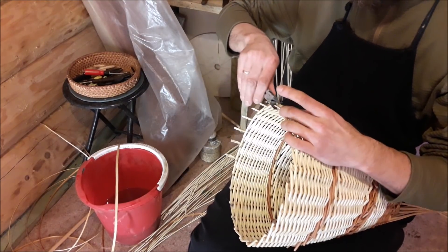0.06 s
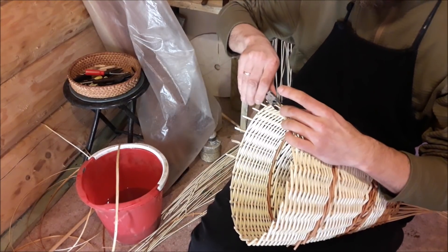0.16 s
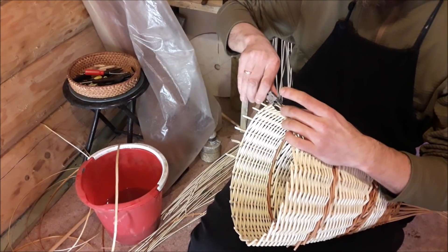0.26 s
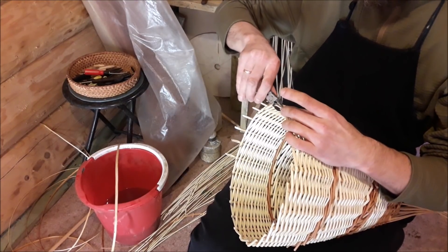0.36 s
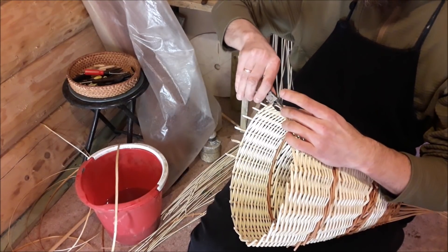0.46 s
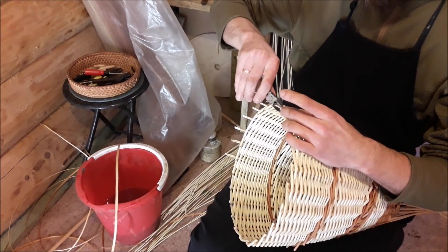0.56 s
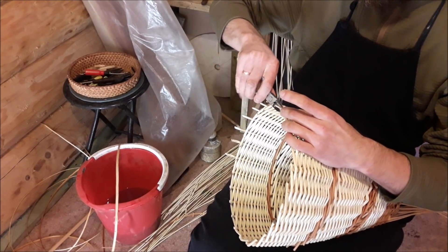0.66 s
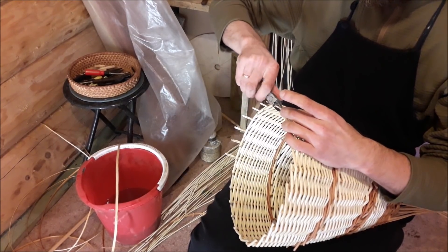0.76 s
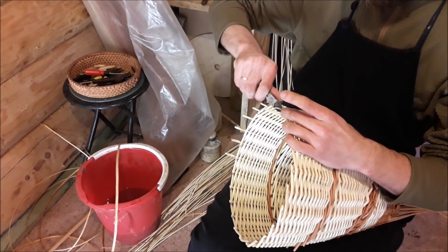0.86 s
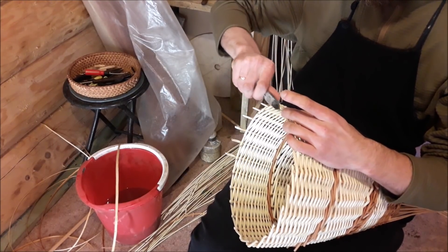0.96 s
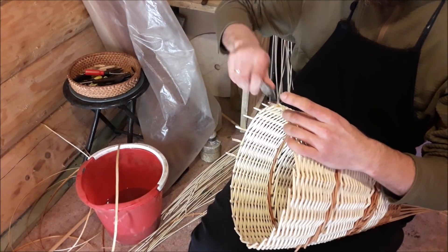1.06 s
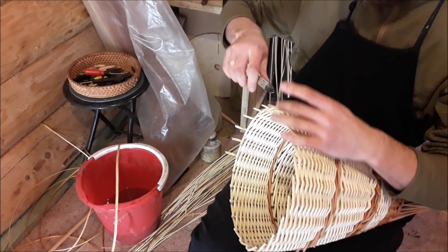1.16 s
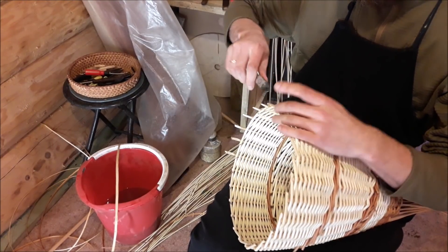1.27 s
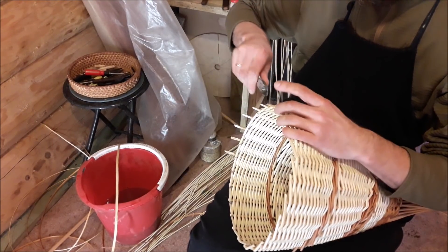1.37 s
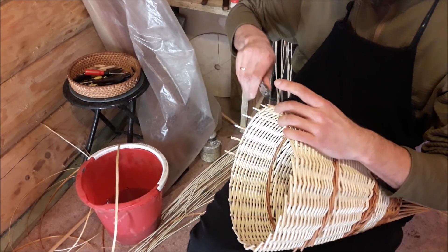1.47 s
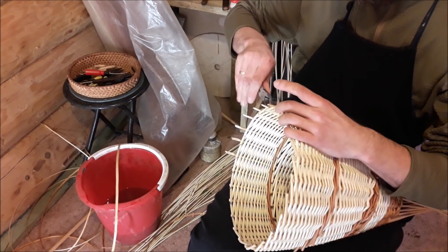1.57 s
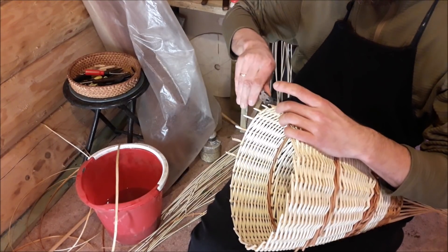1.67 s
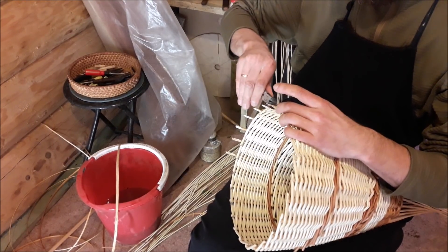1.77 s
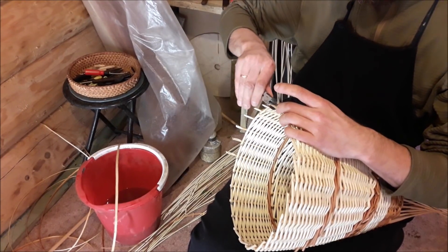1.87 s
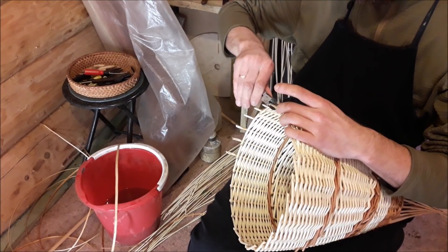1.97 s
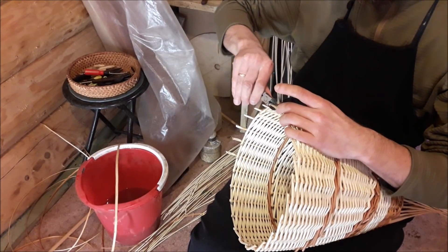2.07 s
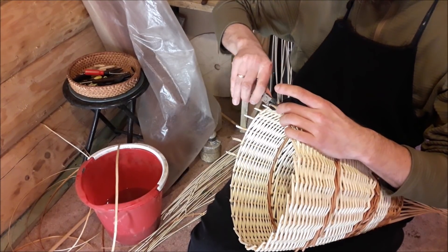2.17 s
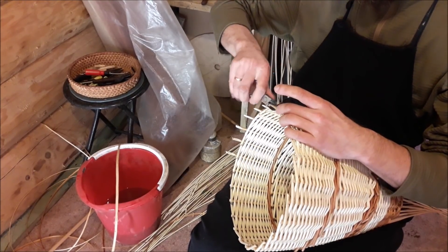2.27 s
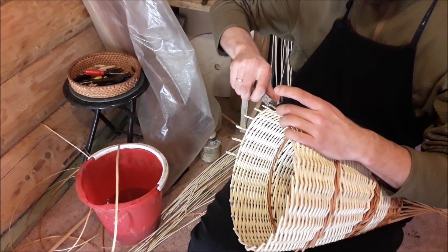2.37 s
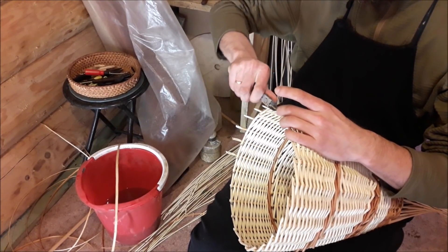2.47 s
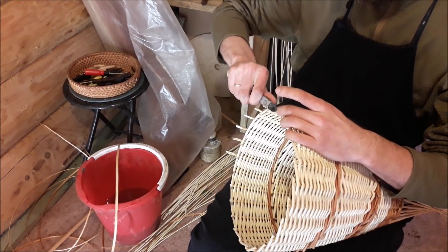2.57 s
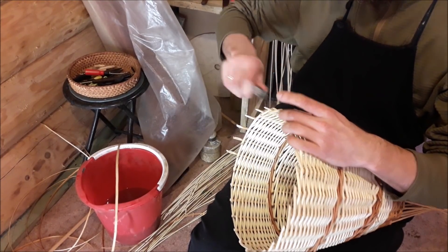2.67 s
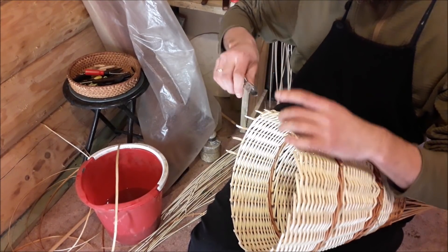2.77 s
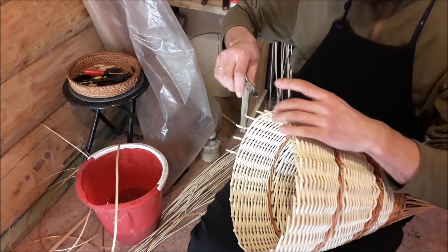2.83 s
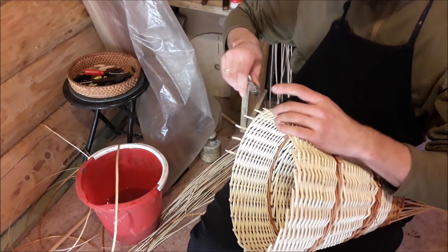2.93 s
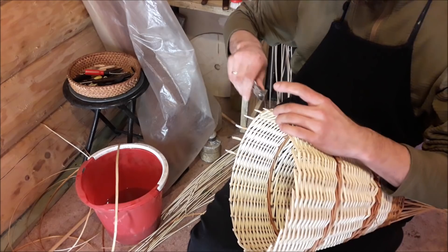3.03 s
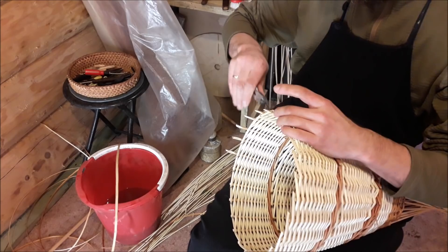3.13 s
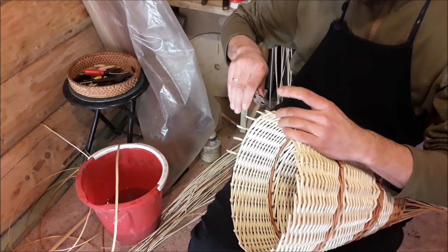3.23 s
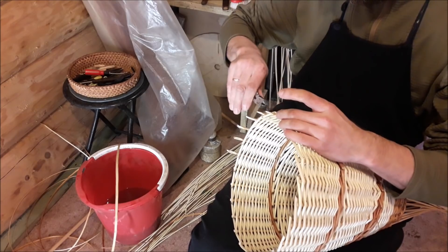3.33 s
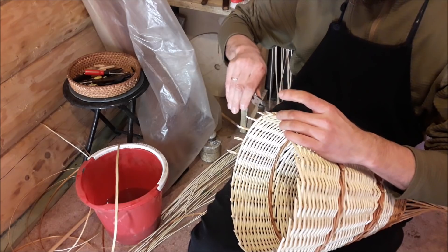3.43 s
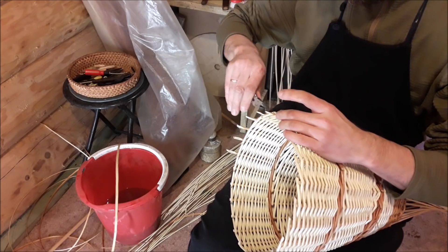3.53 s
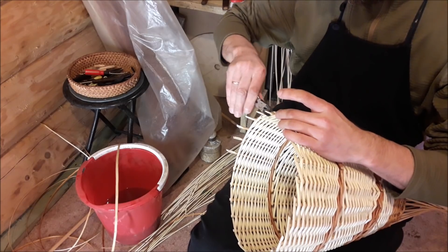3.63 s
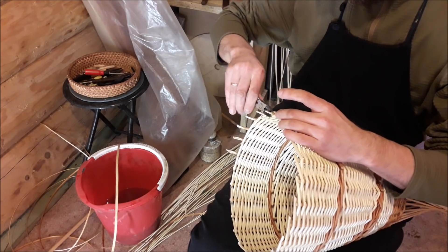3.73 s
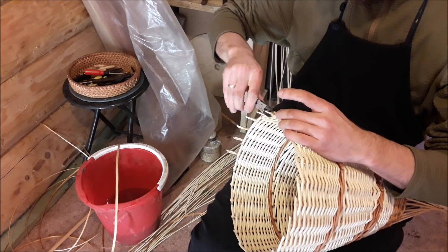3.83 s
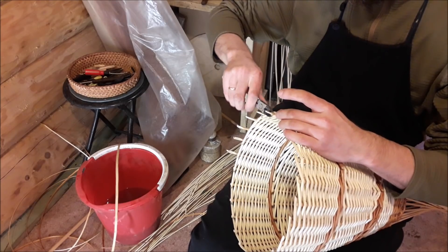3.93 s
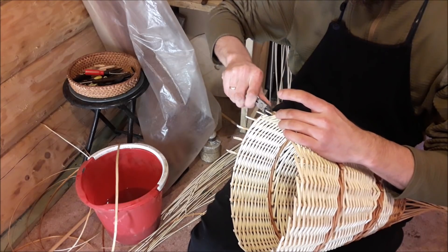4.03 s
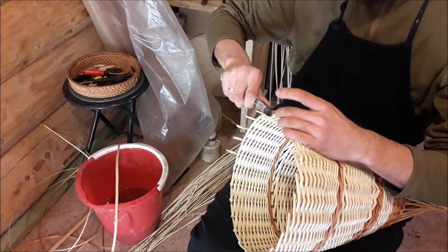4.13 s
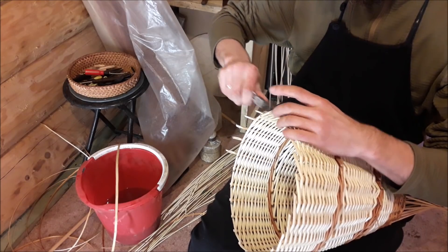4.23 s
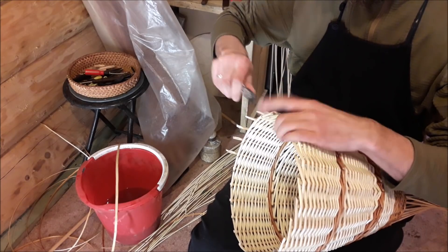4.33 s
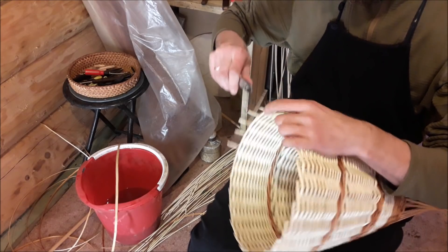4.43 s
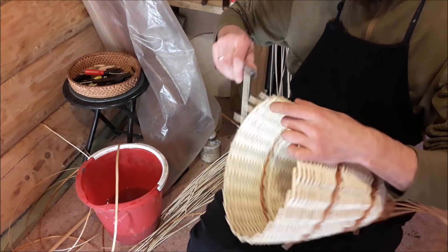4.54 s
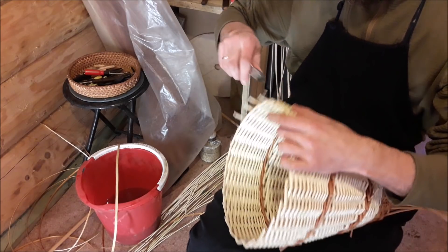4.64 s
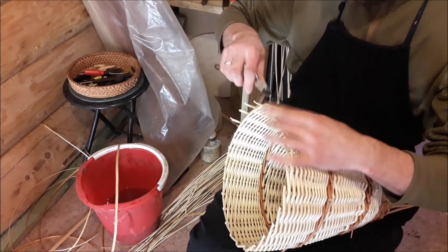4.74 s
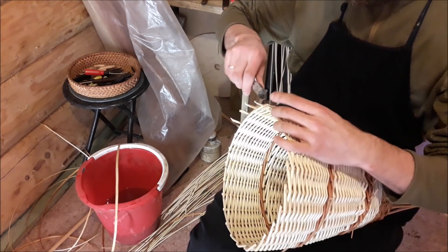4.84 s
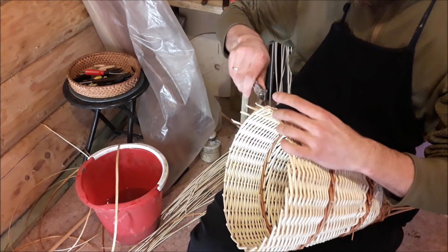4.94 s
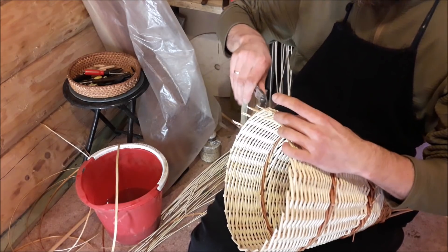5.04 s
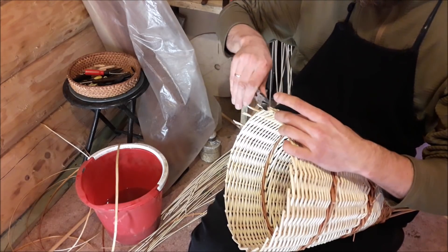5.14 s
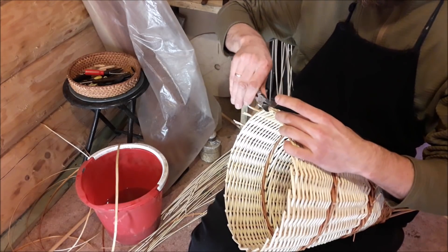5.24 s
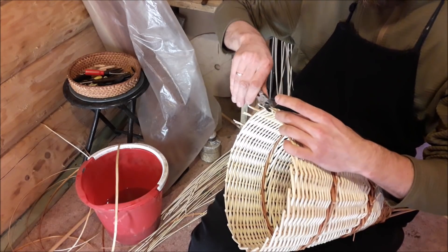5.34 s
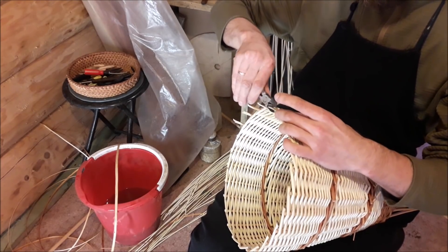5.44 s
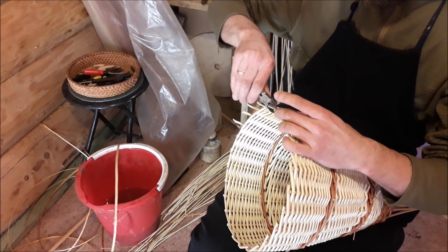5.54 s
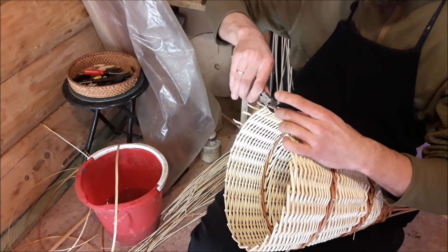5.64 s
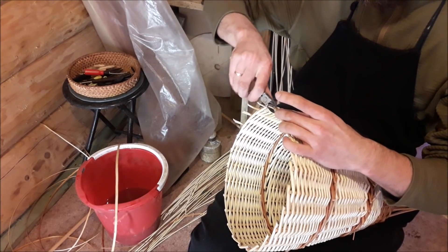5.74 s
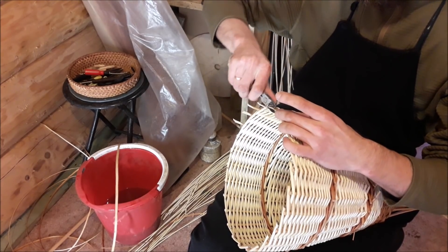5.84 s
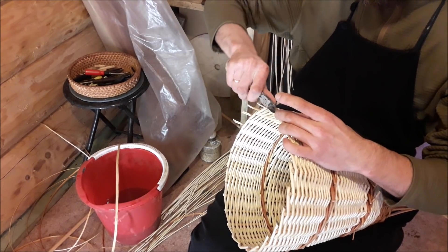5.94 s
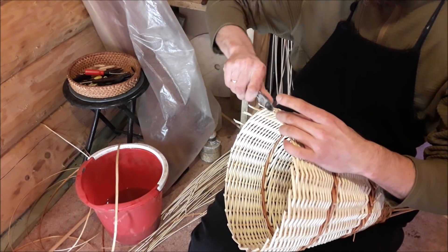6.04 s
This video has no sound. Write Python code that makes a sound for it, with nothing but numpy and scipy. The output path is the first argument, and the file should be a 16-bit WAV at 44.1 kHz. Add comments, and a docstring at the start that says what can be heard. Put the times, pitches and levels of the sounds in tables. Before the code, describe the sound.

Hand shears snip willow rods four times with sharp snaps, with light clicks and a woven basket creaking and knocking between cuts.

```python
"""Trimming a willow basket

A basket maker trims the ends of willow rods with pruning shears in a small wooden workshop.
The jaws open and seat on a rod with light clicks, then the rod gives way and the steel slams shut
and rings. Between cuts the basket is turned: the weave rustles, creaks and knocks.
An automatic gain control ducks after each snap."""
import sys
import numpy as np
from scipy import signal
from scipy.fft import rfft, irfft
from scipy.io import wavfile
from scipy.ndimage import uniform_filter1d

SR = 44100
rng = np.random.default_rng(int(sys.argv[2]) if len(sys.argv) > 2 else 0)


def int16_out(signal):
    """Quantize to a 16-bit WAV file."""
    q = np.round(np.clip(np.atleast_2d(signal).T, -1, 1) * 32767)
    wavfile.write(sys.argv[1], SR, q.astype(np.int16))


N = 269010
SPAN = 10240  # samples in one impulse response
AGE = np.arange(SPAN) / SR
HZ = np.maximum(np.fft.rfftfreq(SPAN, 1 / SR), 1)

# Hands and sleeves sliding over the weave. Each row: start in seconds, length in seconds, peak in dB.
SLIDES = [(0.063, 0.38, -74), (1.26, 0.27, -75.5), (2.741, 0.22, -64.5), (2.95, 0.15, -64.5),
          (3.137, 0.22, -67), (4.03, 0.14, -71.5), (4.25, 0.73, -58.5), (4.846, 0.94, -68.5),
          (5.878, 0.18, -67.5)]
# Jaws opening, seating and biting. Each row: start in seconds, level in dB, tilt in dB per octave,
# ring in Hz, fall on either side of the ring in dB per octave.
JAW_CLICKS = [(0.8677, -10, 1.5, 10000, 5.5), (0.9219, -4, -1.4, 3700, 0.6), (0.9459, -14, -4.5, 620, 1.5),
              (1.142, -9.5, 6.5, 7150, -2), (1.1457, -12.5, 1.4, 3200, 1), (1.54, -25.5, -1, 4230, 3.5),
              (1.576, -2, 2, 4100, 4), (1.5804, -4, 0.3, 4740, 3.5), (2.417, -30.5, 1.5, 5500, 9),
              (2.4583, -8, 1, 4600, 1.5), (2.4669, -13, 8.5, 4740, 1.5), (3.207, -17, 0.5, 5000, -0.5),
              (3.74, -19, -1.5, 5330, -2), (3.9226, 8.5, -1.4, 3320, 3.5), (3.928, 1, -4, 2620, 6),
              (4.1214, -23.5, -2.2, 2000, -2.5), (4.1597, -17, 1, 5370, -5.5), (4.166, -18, -1, 1600, 0.5),
              (6.006, -25.5, 0, 3450, -2.5)]
# Cuts. Each row: start in seconds, level in dB, tilt in dB per octave, lift of the rod's crack in dB,
# ring of its stub in Hz, thump in dB, pitch ratio as the grip shifts, direct sound over room in dB.
CUTS = [(0.9904, 0.7, 1.2, 0.5, 2300, -19, .97, -15.5), (2.5803, -0.16, -0.82, 4.5, 5000, -37, 1.037, -8.5),
        (4.1807, -0.5, -0.46, 7.5, 1714, -39, 1.001, -8), (6.0324, 0.3, 1.2, -1, 2240, -26, 0.98, -14.5)]
# Modes of the shears and the rim they jolt. Each row: frequency in Hz, bandwidth in Hz, lift in dB.
SHEAR_MODES = [(447, 41, 6), (640, 140, 3.5), (1430, 78, 4), (2128, 100, 14), (2461, 160, 10),
               (5322, 50, 9), (5880, 580, 6.5), (6830, 440, 6), (11090, 1500, 5)]
# Woven rods slipping. Each row: start in seconds, level in dB, tilt in dB per octave, ring in Hz.
CREAKS = [(1.218, -22.5, 4, 2340), (1.732, -13, -2, 2750), (1.834, -21, 6.5, 4650), (1.852, -16, 1, 6650),
          (1.881, -21, 2, 3680), (1.926, -22.5, 2, 2140), (1.962, -29.5, 0.5, 2200), (1.999, -20, 1, 2370),
          (4.364, -23.5, -3, 2590), (4.436, -17, 1.5, 6500), (4.636, -24.5, 2, 3220),
          (5.255, -16.5, 2, 1860), (5.339, -17, 0.5, 1970)]
# Hands and shears bumping the basket. Each row: start in seconds, level in dB, tilt in dB per octave,
# ring in Hz, length of the touch in seconds.
KNOCKS = [(1.576, -12.5, -3, 1000, 0.0037), (1.607, -24, -4.5, 201, 0.0033), (1.869, -19, -4, 392, 0.0027),
          (2.4589, -8, -0.5, 350, .001), (2.834, -17, 1, 312, 0.0098), (3.0478, -18.5, 3, 382, 0.0062),
          (4.526, -18.5, 1.5, 360, 0.0067), (4.832, 3, -1.05, 720, 0.0072), (5.002, -4.5, 1, 425.5, .011),
          (5.04, -5.5, 1.3, 1080, .009), (5.125, -6, -0.5, 270, 0.0062), (5.256, -12, 5, 484, 0.0069)]
# Spectra of the sources. Each row: frequency in Hz, relative level in dB.
ROOM_COLOUR = [(20, 2), (45, -4), (110, 2), (300, 1), (550, -1.5), (1000, -6.5), (2000, -9), (4000, -13.5),
               (7000, -23), (10500, -17.5), (13000, -15), (16000, -22)]
RUB_COLOUR = [(100, -10.5), (400, -3), (1500, -1), (3200, -2.5), (7000, -4), (10500, -6), (15500, -6)]
CLICK_COLOUR = [(65, -22.5), (130, -18), (330, -12), (900, -8), (2200, -5.5), (3700, -1.5), (6000, 0),
                (12500, -6.5)]
CUT_COLOUR = [(30, -18.5), (65, -12.5), (130, -5), (330, 10), (900, 9), (2200, 7), (3700, 13), (5500, 16.5),
              (12500, 15.5)]
CREAK_COLOUR = [(65, -47), (130, -34), (330, -33), (900, -7.5), (2200, 0.5), (3700, 0), (6000, -4.5),
                (12500, -17.5)]
KNOCK_COLOUR = [(65, -38), (160, -17), (330, -2.5), (900, -2.5), (2200, -6), (3700, -13), (6000, -16),
                (12500, -33)]
# Reverberation of the workshop. Each row: frequency in Hz, time to decay by 60 dB in seconds.
ROOM_T60 = [(150, 0.18), (500, 0.19), (2000, .17), (5500, 0.15), (9000, .145), (15000, .13)]
# The microphone's bass cut and treble dip. Each row: frequency in Hz, gain in dB.
MICROPHONE = [(20, -14.5), (80, -2), (160, -1), (7350, -1), (7900, -6.5), (9000, -6.5), (10300, -3.5),
              (16000, -2)]


def from_db(db):
    """Amplitude grows tenfold for every 20 dB."""
    return 10 ** (np.asarray(db) / 20)


def unit_energy(x):
    """Normalisation: the squared samples sum to one."""
    return x / np.sqrt(np.sum(x ** 2) + 1e-20)


def add(track, start_s, sound):
    """Superposition: a sound adds to the track from its start time."""
    start = int(start_s * SR)
    track[start:start + len(sound)] += sound[:N - start]


def coloured(x, points):
    """Minimum-phase filtering: folding the cepstrum makes a (Hz, dB) response causal."""
    known_hz, known_db = np.transpose(points)
    gain_db = np.interp(np.log(HZ), np.log(known_hz), known_db)
    cepstrum = irfft(np.log(from_db(gain_db)))
    cepstrum[1:SPAN // 2] *= 2
    cepstrum[SPAN // 2 + 1:] = 0
    response = irfft(np.exp(rfft(cepstrum)))
    return signal.fftconvolve(x, response)[:len(x)]


def steady(source, colour):
    """Spectral shaping, normalised to an rms of one."""
    return unit_energy(coloured(source, colour)) * np.sqrt(N)


def whitened(x, bins):
    """Whitening: dividing out the smoothed spectrum leaves only its fine ripple."""
    broad_db = 10 * np.log10(uniform_filter1d(np.abs(rfft(x)) ** 2, size=bins) + 1e-12)
    return coloured(x, np.column_stack([HZ, -broad_db]))


def resonate(x, hz, width_hz, lift_db):
    """Resonance: the narrower a lifted band, the longer it rings."""
    b, a = signal.iirpeak(hz, hz / width_hz, fs=SR)
    return x + (from_db(lift_db) - 1) * signal.lfilter(b, a, x)


def crack(spread_s=0.0012):
    """Dispersion: bending waves carry treble faster than bass and smear a click."""
    delay_s = spread_s * (1 - np.sqrt(HZ / HZ[-1])) + 1e-4
    spectrum = np.exp(-2j * np.pi * np.cumsum(delay_s) * SR / SPAN)
    return irfft(spectrum) * (AGE < 2 * spread_s)


def splinters(count, length_s):
    """Shot noise: fibres slip one after another in a cluster that swells quickly and fades."""
    out = np.zeros(SPAN)
    slip_s = np.minimum(rng.gamma(2, length_s / 2, count), AGE[-1])
    out[(slip_s * SR).astype(int)] = rng.standard_normal(count) * np.exp(-0.5 * slip_s / length_s)
    return unit_energy(out)


def workshop(direct_db, hold_s, build_s=0.0012, lumpy_db=4.0, lumpy_s=0.015):
    """Reverberation: after the direct sound, echoes off basket, floor and boards merge into a tail."""
    lumps = from_db(lumpy_db * np.exp(-AGE / lumpy_s) * (rng.standard_normal(SPAN) - 0.5))
    echoes = rfft(rng.standard_normal(SPAN) * lumps)
    # the reflections hold their level briefly, then each band dies at its own rate
    band = np.argmin([np.abs(np.log(HZ / hz)) for hz, _ in ROOM_T60], axis=0)
    late_s = np.maximum(AGE - hold_s, 0)
    tail = sum(irfft(echoes * (band == k)) * from_db(-60 * late_s / t60)
               for k, (_, t60) in enumerate(ROOM_T60))
    response = unit_energy(tail * (1 - np.exp(-AGE / build_s)))
    response[0] += from_db(direct_db)
    return response


def contact(force, colour, level_db, tilt_db, pivot_hz, direct_db, hold_s):
    """Source and filter: a force is convolved with the room, whitened and given a tilted spectrum."""
    reflected = signal.fftconvolve(force, workshop(direct_db, hold_s))[:SPAN]
    tilted = [(hz, db + level_db + tilt_db * np.log2(hz / pivot_hz)) for hz, db in colour]
    return coloured(whitened(reflected, bins=70), tilted)


def room_tone(level_db=-64.5):
    """Stationary noise: a faint background, strongest in the bass."""
    return from_db(level_db) * steady(rng.standard_normal(N), ROOM_COLOUR)


def rubbing(grain_db=5.0, resting_db=-88, uneven_db=0.5, catches_per_s=45):
    """Sliding friction: skin and cloth catch on the rods, louder as each slide gains speed."""
    knots = np.arange(N) / SR * catches_per_s
    catch_db = uneven_db * np.interp(knots, np.arange(1024), rng.standard_normal(1024))
    grains = rng.standard_normal(N) * from_db(catch_db + grain_db * rng.standard_normal(N))
    speed = np.full(N, from_db(resting_db))
    for start_s, length_s, peak_db in SLIDES:
        arch = np.sin(np.linspace(0, np.pi, int(length_s * SR)))
        add(speed, start_s, from_db(peak_db) * arch)
    return speed * steady(grains, RUB_COLOUR)


def jaw_clicks(q=6.0):
    """Impact excitation: the jaws tick on each other and on the willow, ringing one resonance."""
    out = np.zeros(N)
    for start_s, level_db, tilt_db, hz, fall_db in JAW_CLICKS:
        force = crack() + 0.35 * splinters(count=12, length_s=0.0015)
        tick = contact(force, CLICK_COLOUR, level_db, tilt_db,
                       pivot_hz=3700, direct_db=-6.0, hold_s=0.003)
        skirt_db = -fall_db * np.abs(np.log2(HZ / hz))
        tick = coloured(tick, np.column_stack([HZ, skirt_db]))
        add(out, start_s, resonate(tick, hz, hz / q, lift_db=5.5))
    return out


def thump(level_db, hz=170, t60_s=0.011):
    """Damped oscillation: one low mode of the jolted basket decays exponentially."""
    return from_db(level_db - 60 * AGE / t60_s) * np.sin(2 * np.pi * hz * AGE)


def cuts(rod_hz=3600, rod_width_hz=960, stub_q=3.3):
    """Fracture and impact: the rod splits, the blades slam shut, and stub, shears and basket ring."""
    out = np.zeros(N)
    for start_s, level_db, tilt_db, rod_db, stub_hz, thump_db, pitch, direct_db in CUTS:
        force = crack() + 0.9 * splinters(count=30, length_s=0.0026)
        snap = contact(force, CUT_COLOUR, level_db, tilt_db,
                       pivot_hz=3000, direct_db=direct_db, hold_s=0.014)
        snap = resonate(snap, rod_hz, rod_width_hz, rod_db)
        snap = resonate(snap, stub_hz, stub_hz / stub_q, lift_db=7.0)
        for hz, width_hz, lift_db in SHEAR_MODES:
            snap = resonate(snap, hz * pitch, width_hz, lift_db)
        add(out, start_s, snap + thump(thump_db))
    return out


def creaks(q=5.8):
    """Stick-slip friction: woven rods slip in bursts, each ringing at the pitch of its free length."""
    out = np.zeros(N)
    for start_s, level_db, tilt_db, hz in CREAKS:
        force = splinters(count=36, length_s=0.007)
        creak = contact(force, CREAK_COLOUR, level_db, tilt_db,
                        pivot_hz=3700, direct_db=-2.5, hold_s=0.0028)
        add(out, start_s, resonate(creak, hz, hz / q, lift_db=8.5))
    return out


def knocks(q=4.5):
    """Wall resonance: a soft bump shakes many rods and the basket answers with a hollow note."""
    out = np.zeros(N)
    for start_s, level_db, tilt_db, hz, length_s in KNOCKS:
        force = splinters(count=36, length_s=length_s)
        knock = contact(force, KNOCK_COLOUR, level_db, tilt_db,
                        pivot_hz=970, direct_db=-5.5, hold_s=0.0028)
        add(out, start_s, resonate(knock, hz, hz / q, lift_db=8.5))
    return out


def gain_control(x, threshold_db=-30, slope=0.14, release_db_per_s=1.0, attack_s=0.0018):
    """Compression: loud snaps push the gain down quickly, and it creeps back up."""
    pole = np.exp(-1 / (attack_s * SR))
    power = signal.lfilter([1 - pole], [1, -pole], x ** 2)
    excess_db = np.maximum(10 * np.log10(power + 1e-12) - threshold_db, 0)
    release_db = release_db_per_s * np.arange(N) / SR
    held_db = np.maximum.accumulate(slope * excess_db + release_db) - release_db
    reduction_db = signal.lfilter([1 - pole], [1, -pole], held_db)
    return x * from_db(-reduction_db)


def scene():
    """Superposition: room tone, shears and basket sum in one channel."""
    return (room_tone() + cuts() + jaw_clicks() + creaks() + knocks() + rubbing())[None]


def record(dry):
    """Transduction: microphone colour, gain control, soft saturation and a steep low-pass."""
    picked_up = coloured(dry[0], MICROPHONE)
    rounded = np.tanh(gain_control(picked_up))
    low_pass = signal.ellip(10, 0.1, 80, 15850, fs=SR, output="sos")
    return signal.sosfilt(low_pass, rounded)[None]


dry = scene()
out = record(dry)
int16_out(out)
```